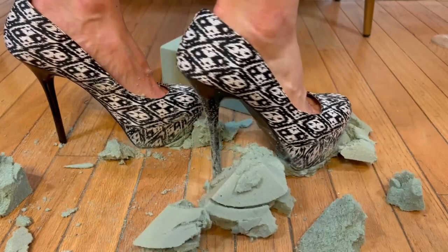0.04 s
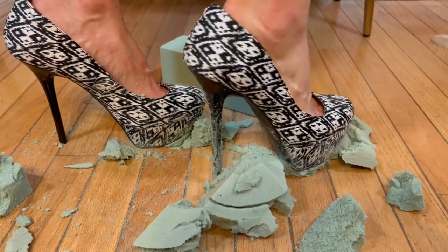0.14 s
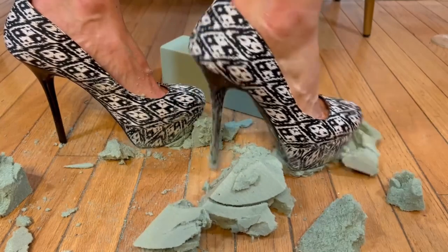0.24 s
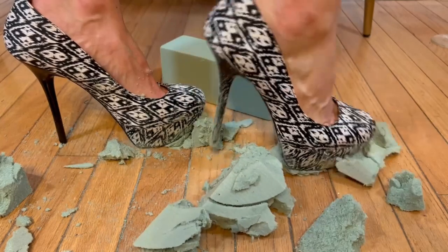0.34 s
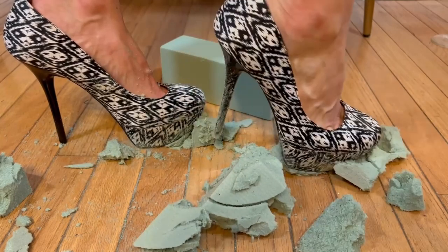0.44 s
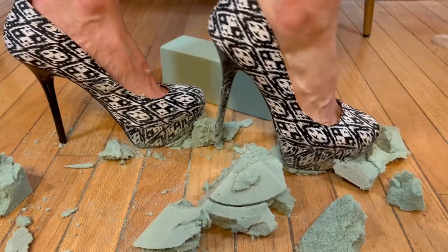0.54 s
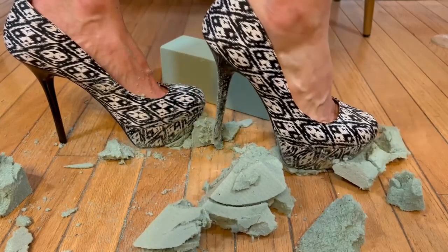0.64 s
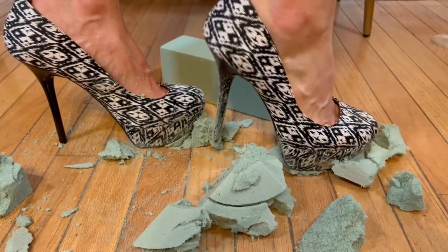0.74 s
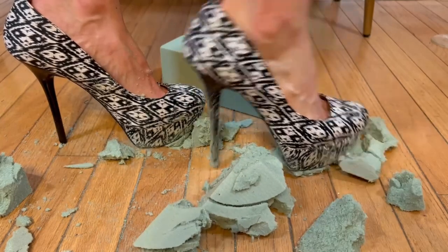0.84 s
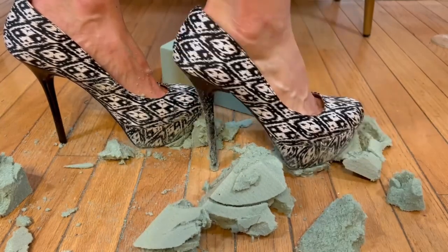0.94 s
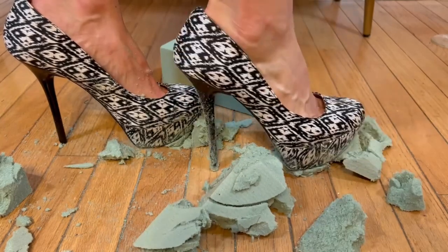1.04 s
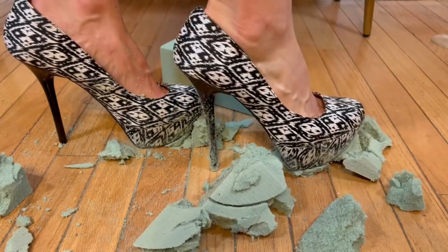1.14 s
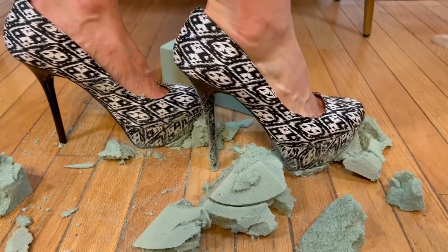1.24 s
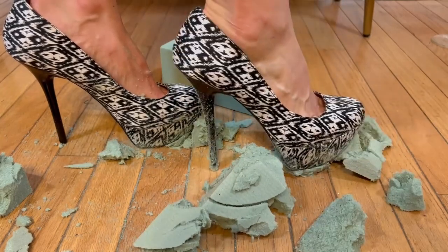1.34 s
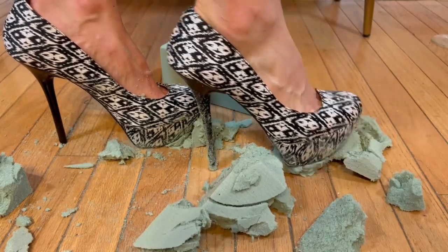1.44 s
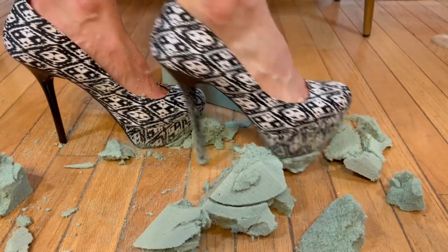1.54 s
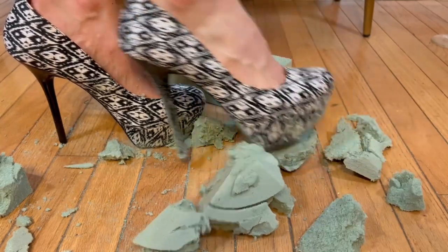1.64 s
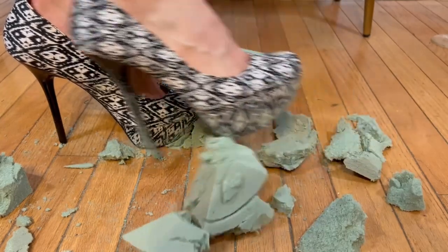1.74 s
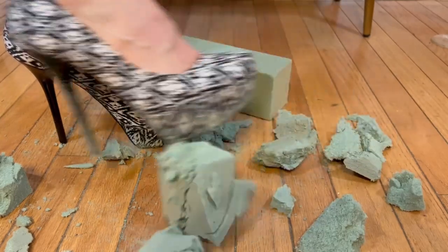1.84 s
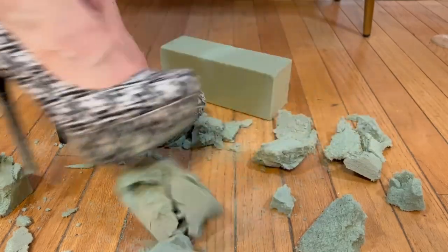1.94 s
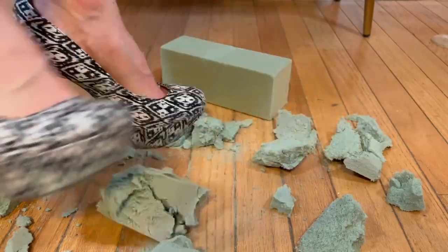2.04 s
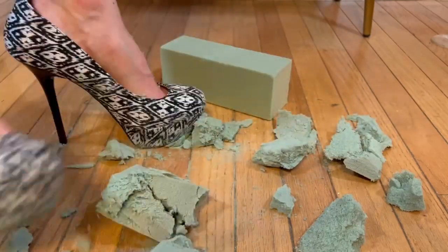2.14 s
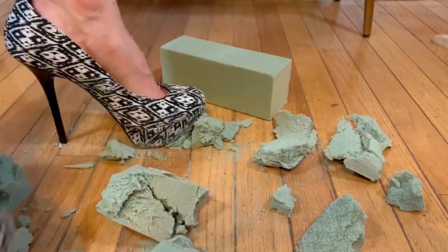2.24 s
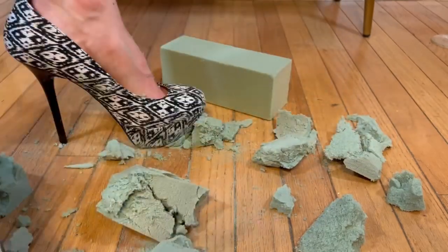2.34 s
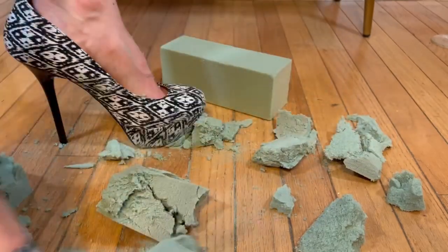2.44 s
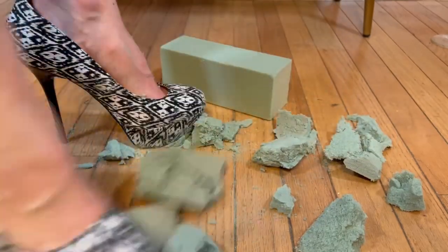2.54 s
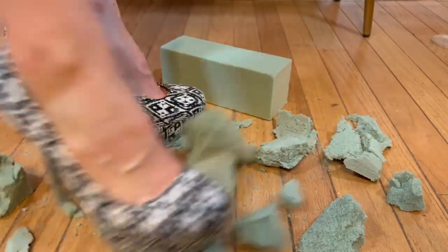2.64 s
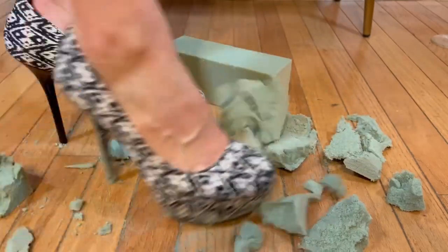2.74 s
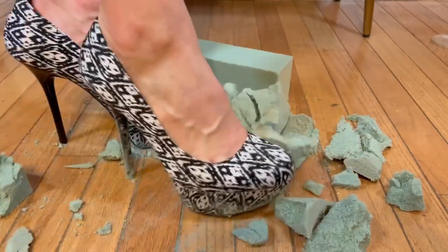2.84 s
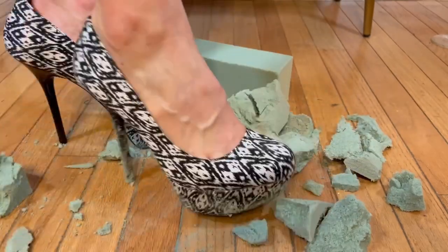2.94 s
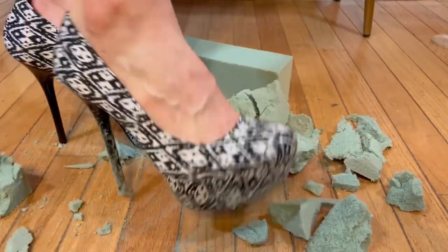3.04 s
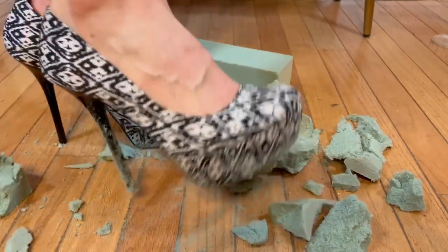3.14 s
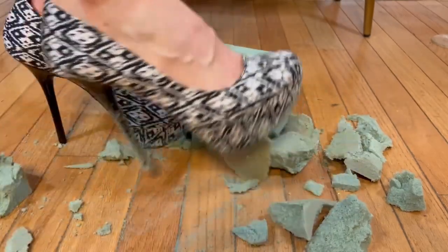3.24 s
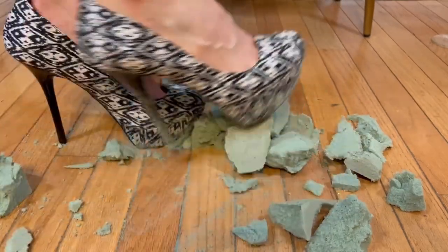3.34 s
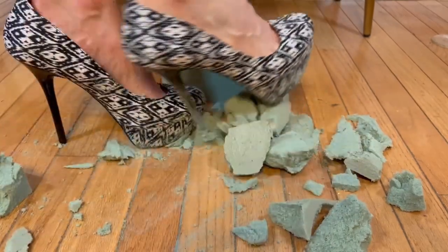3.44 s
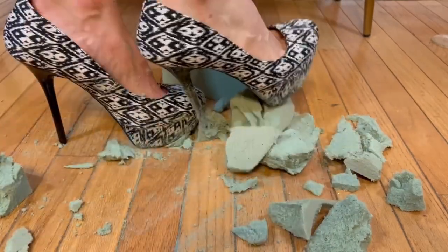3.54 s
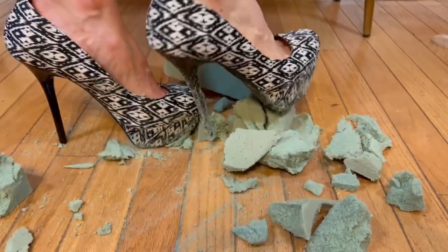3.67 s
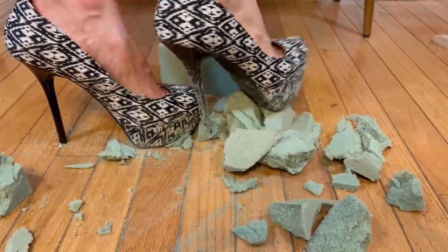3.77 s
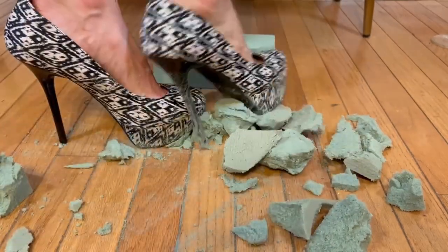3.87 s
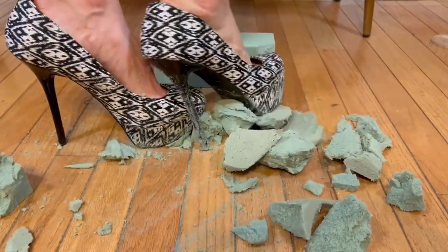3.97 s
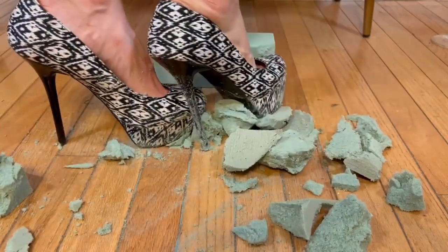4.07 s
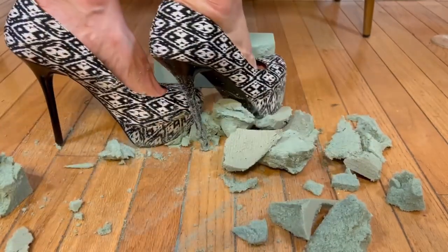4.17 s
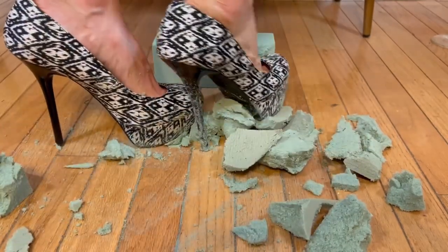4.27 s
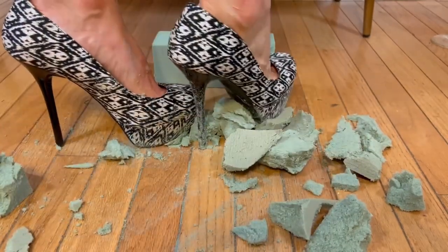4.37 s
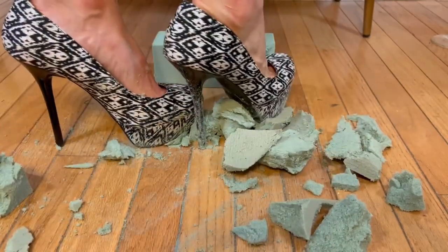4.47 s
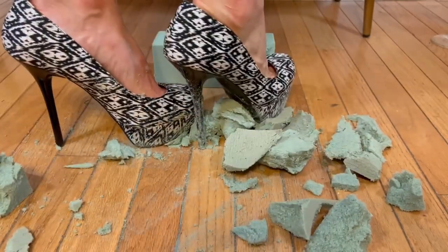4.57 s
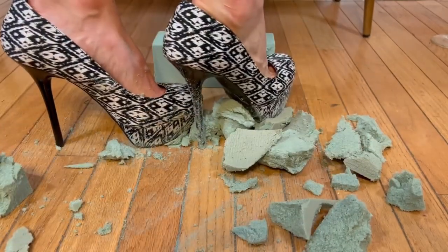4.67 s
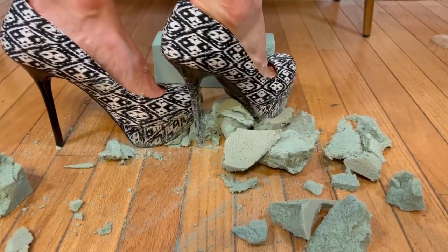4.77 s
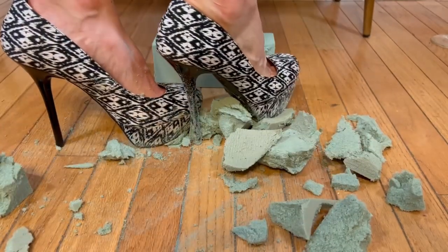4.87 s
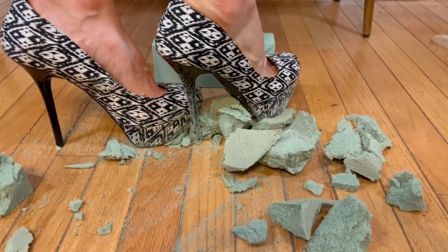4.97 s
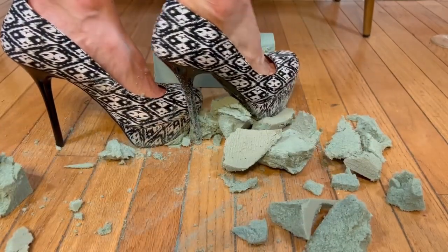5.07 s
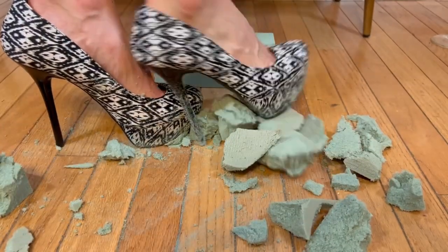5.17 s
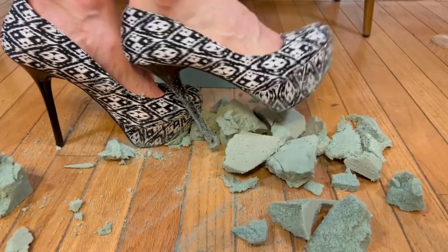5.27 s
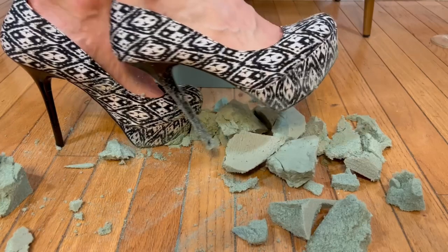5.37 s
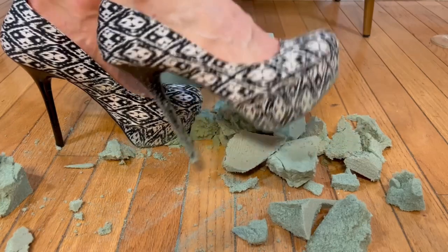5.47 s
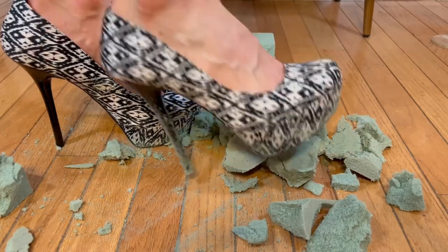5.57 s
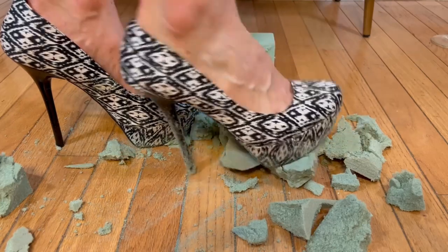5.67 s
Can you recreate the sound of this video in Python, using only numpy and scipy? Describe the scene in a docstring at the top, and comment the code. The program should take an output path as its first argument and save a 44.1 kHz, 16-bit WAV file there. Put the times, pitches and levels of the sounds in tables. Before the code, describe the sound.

Dry foam crunches and crackles at once under a stiletto shoe, heard close in a quiet room with a faint hum. The foam squeaks briefly against the sole at about 0.3 seconds and again at 0.8, followed by a sharp crack and a thud on the wooden floor at 0.9. Until 2.5 there is only faint crumbling, with small ticks and taps. Several knocks on the boards come with light crunches between 2.5 and 2.9. From 3.5 a knock and lower, stuttering squeaks lead into the loudest crunch, near 3.8. A heel knocks just before 4, and dense, crisp snaps run on to about 4.3. The foam creaks from 4.7 to 4.9 and crunches softly around 5.1. A heavy, dull thud on the floorboards comes at about 5.7.

```python
"""Dry craft foam crunches, snaps and squeaks under stiletto heels on a wooden floor, heard up close.
Countless tiny cells collapse to make the crunch, and single cell walls break with a snap.
The foam sticks and slips against the sole: fast slips squeak, slow uneven ones creak.
Heel and sole knock the boards, which ring and rumble. The room is quiet; the house hums faintly."""
import sys
import numpy as np
from scipy import signal
from scipy.fft import rfft, irfft, next_fast_len
from scipy.io import wavfile
from scipy.ndimage import uniform_filter1d, map_coordinates

SR = 44100
rng = np.random.default_rng(int(sys.argv[2]) if len(sys.argv) > 2 else 0)


def generate_wav(signal):
    """Clip the signal to [-1, 1] and save it as 16-bit WAV at the path in sys.argv[1]."""
    frames = np.transpose(np.atleast_2d(signal))
    scaled = np.clip(frames, -1, 1) * 32767
    pcm = np.round(scaled).astype(np.int16)
    wavfile.write(sys.argv[1], SR, pcm)


N = 251798

# how alike left and right sound: f/Hz, likeness (1 = the same)
LIKENESS = [(30, 0.89), (60, 0.88), (130, 0.91), (290, 0.44), (640, 0.46), (1400, 0.23), (3000, 0.24),
            (7000, 0.14)]
# how long the room echoes: f/Hz, time to fade by 60 dB/s
ROOM_DECAY = [(100, 0.35), (500, 0.31), (2000, 0.38), (6000, 0.29), (14000, 0.075)]
# tone colour of the room's air: f/Hz, level/dB
AIR_COLOUR = [(15, -48), (25, 4), (53, 0.5), (146, -9.5), (242, -12), (339, -52), (392, -29), (431, -19.5),
              (635, -26), (868, -29), (1000, -33), (1080, -64), (8000, -43), (11000, -48), (16000, -60)]
# the tones of the house hum: f/Hz, relative level/dB
HUM_TONES = [(41, -76), (119, -76.5)]
# a thin drone that fades and swells: t/s, relative level/dB
DRONE_LEVELS = [(0, -74.5), (1.5, -78), (4.5, -75.5), (5.71, -68.5)]
# the notes the floorboards ring at: f/Hz, level/dB, time to fade by 60 dB/s
BOARD_NOTES = [(42.1, -7.5, 0.92), (71.5, -11.5, 0.26), (84.8, -6, 0.28), (118.5, -0.5, 0.19),
               (176.8, 4.5, 0.049), (248.3, -4.5, 0.055), (311.7, -0.5, 0.057), (467, -1.5, 0.038),
               (591, -11, 0.046), (739, -11.5, 0.078)]
# heel and sole hit the boards: t/s, level/dB, hardness/dB, heaviness/dB, thud f/Hz
KNOCKS = [(0.238, -41, -34, -4, 87), (0.847, -42, -18, -30, 190), (0.894, -15.5, -18.5, -15.5, 125.3),
          (0.939, -35, -26, -21, 105.6), (0.958, -41, -13, -1, 90.1), (1.087, -47.5, -6, -3, 89),
          (1.283, -47.5, -7, -14.5, 154), (1.332, -41, -9.5, -35, 130), (1.985, -44, -22, -15, 119),
          (2.457, -36.5, -14, -7, 125), (2.578, -19, -22, -30, 121.6), (2.635, -25.5, -32, -42, 113),
          (2.69, -25, -18.5, -25, 118), (2.743, -33.5, -17, -28, 118), (3.462, -28.5, -15, -19, 80),
          (3.91, -25.5, -38, -31, 148), (3.951, -19.5, -10, -25, 92), (3.978, -36, -20, -23.5, 97),
          (4.326, -38.5, -26, -21, 109), (4.453, -39, -25, -8.5, 106), (4.691, -39, -21, -26, 97),
          (4.877, -43.5, -12, -25, 149), (4.93, -39.5, -28, -25, 136), (5.152, -41.5, -23, -33, 160),
          (5.236, -40, -33, -7.5, 73), (5.685, -33.5, -17, -36.5, 170), (5.698, -10, -45.5, -42.5, 110)]
# slow slips under load: start t/s, end t/s, first and last slip rate/Hz,
# first and last level/dB, low and high band edge f/Hz
CREAKS = [(1.297, 1.359, 400, 270, -59, -34, 5500, 9200), (4.701, 4.922, 150, 320, -25.5, -38.5, 800, 4630)]
# foam slipping on the sole, one list for each squeak: t/s, slip rate/Hz, level/dB
SQUEAKS = [
    [(.245, 1170, -30.5), (.254, 1302, -22.5), (.28, 1266, -19.5), (.293, 1183, -29.5), (.312, 1094, -40),
     (.335, 1058, -42), (.342, 1020, -62)],
    [(.300, 1438, -54), (.312, 1470, -25.5), (.335, 1380, -35.5), (.345, 1400, -70)],
    [(.764, 898, -49), (.768, 934, -21), (.775, 983.5, -19.5), (.803, 963.4, -23.5), (.817, 777, -24.5),
     (.838, 698, -33.5), (.843, 706, -51.5)],
    [(2.79, 1045, -46), (2.797, 1025, -41), (2.815, 1050, -60), (2.825, 1075, -77)],
    [(3.51, 420, -49), (3.525, 457, -41.5), (3.585, 455.3, -36), (3.60, 440, -69)],
    [(3.585, 740, -38), (3.6, 716, -37), (3.63, 733, -44), (3.645, 745, -57)],
    [(3.688, 481, -26), (3.70, 501.6, -40), (3.722, 482, -41), (3.732, 434, -25.5), (3.765, 462.6, -37.5),
     (3.78, 415, -43)],
]
# tone colour of a squeak on the sole: f/Hz, level/dB
SOLE_COLOUR = [(250, -18), (460, 10.5), (900, -4), (1300, -0.5), (2500, 1), (3700, -10), (4400, -1),
               (5000, -6.5), (7000, -9.5), (9000, -1), (12000, -2), (16000, -28)]
# single cell walls breaking: t/s, ring level/dB, ring f/Hz, crack level/dB, treble level/dB
SNAPS = [(0.042, -31, 566, -32, -21), (0.0462, -39, 664, -23, -37), (0.4251, -34.5, 1180, -24, -41),
         (0.5289, -32.5, 1980, -32, -53), (0.5797, -43, 1680, -57, -38), (1.2794, -47, 670, -49, -62.5),
         (1.2958, -41.5, 2260, -35, -54), (1.4029, -38.5, 2850, -43, -36.5), (1.4125, -39, 5060, -25, -35),
         (1.9046, -41.5, 3260, -39.5, -34), (1.9733, -43, 1740, -27.5, -36), (2.2072, -57, 790, -44.5, -57),
         (2.6475, -35, 4590, -33, -23), (2.7941, -34, 2030, -26.5, -27), (2.9303, -44, 2010, -37, -33),
         (2.9561, -40.5, 2800, -45, -51), (3.04, -56, 810, -60, -69), (3.446, -44, 2630, -40, -31),
         (3.9102, -25.5, 4740, -16, -13), (3.9537, -23.5, 1540, -23, -14), (3.9843, -22.5, 845, -44, -37),
         (4.0041, -23, 4000, -14, -29.5), (4.014, -25, 1940, -40, -20), (4.0325, -22.5, 3870, -21, -26),
         (4.041, -25.5, 910, -37, -27), (4.0593, -31, 3760, -41, -25), (4.0981, -24, 4970, -10.5, -38),
         (4.114, -21.5, 960, -13, -36), (4.1945, -20, 3530, -14, -12), (4.2939, -30.5, 1250, -21, -23),
         (4.3332, -23.5, 4470, -21, -19.5), (4.6449, -42, 1185, -36, -66), (4.6744, -35, 990, -38, -51),
         (4.6786, -33, 2360, -33, -54), (4.9643, -47, 4480, -49, -30.5), (4.992, -53, 1180, -40, -50),
         (5.246, -55, 1100, -40, -58), (5.4846, -57, 794, -42.5, -53)]
# runs of snaps: start t/s, end t/s, gap/s, ring level/dB, ring f/Hz, crack level/dB, treble level/dB
SNAP_RUNS = [(.0005, .026, 0.005, -25, 4170, -38, -23), (.8439, .862, 0.0048, -18.5, 3420, -19.5, -10.5),
             (4.4716, 4.515, .0119, -43.5, 705, -39, -38), (4.6989, 4.76, 0.017, -49, 1190, -57, -66)]
# tone colours of the crunch, from coarse breaks through cells to fine dust: f/Hz, level/dB
COARSE_COLOUR = [(150, -23), (300, -7), (450, -7.5), (700, -1.5), (1100, 0), (2000, -3), (4000, -57)]
CELL_COLOUR = [(600, -12), (1300, -18.5), (2200, 2), (3500, -1), (5500, -2), (8000, -4.5), (10000, -24)]
DUST_COLOUR = [(6500, -17.5), (8800, -5), (10000, -14.5), (11600, -1.5), (12500, -10.5), (14000, -12),
               (16000, -7.5)]
# the shoe presses the foam: t/s, rise/s, level/dB, hold/s, fall/(dB/s), coarse offset/dB, dust offset/dB
PRESSES = [(0, 0.011, -34.5, 0.013, 166, -0.5, -5), (0.236, 0.26, -51, .005, 498, 1, 4),
           (.25, 0.018, -29.5, 0.039, 495.5, -16, -4.5), (0.297, .01, -39, .005, 75.5, -1, -5),
           (0.759, 0.084, -49.5, .005, 499, 2.5, -1), (0.768, 0.0083, -29.5, 0.09, 230, -29, -2.5),
           (0.855, .02, -35, .005, 110, -3, -7), (1.298, 0.023, -54.5, .005, 89, 2.8, -8),
           (1.41, 0.052, -54, 0.52, 44, -4, 1.3), (1.972, 0.019, -56, .005, 93, -12, 2),
           (2.549, 0.26, -49.5, 0.034, 100, -2.5, 2), (2.66, 0.27, -43, .005, 83.5, -14.5, 3),
           (2.804, 0.25, -45, .005, 165, -8, -19), (2.922, 0.027, -57, 0.0082, 96, -12, -6),
           (3.451, 0.016, -34, 0.21, 104, -9.5, -2), (3.599, 0.14, -29, 0.031, 135, -4.5, -21.5),
           (3.71, 0.059, -20.5, 0.0054, 119, -4, -10), (3.813, 0.29, -36, 0.32, 107, -5, -1),
           (4.193, 0.01, -43, 0.0062, 250, -4, -1), (4.226, 0.022, -39, .12, 129, -9, 2.5),
           (4.678, 0.027, -53, 0.21, 75, 5, -1.5), (5.088, 0.26, -58.5, .03, 97, -2, 6),
           (5.128, 0.053, -45.5, 0.032, 108, -3.5, -2), (5.46, 0.13, -68, 0.0066, 132.5, -6, 2.5),
           (5.684, 0.016, -51, .03, 100, -3, 2.5)]
# crumbs settling between presses: coarse level/dB, cell level/dB, dust level/dB
SETTLING = (-73.5, -72.5, -71.5)

TOP_HZ = 16100  # the highest pitch heard


def amp(db):
    """Turns decibels into a number to multiply by."""
    return 10 ** (np.asarray(db) / 20)


def unit(x):
    """Scales a signal to an average strength (rms) of 1."""
    return x / np.sqrt(np.mean(x ** 2) + 1e-20)


def along(points, hz):
    """Reads between (Hz, value) points on a log frequency scale."""
    f, v = np.transpose(points)
    return np.interp(np.log(hz + 1), np.log(f + 1), v)


def curves(rows, t):
    """Reads each column after the first at times t."""
    s, *columns = np.transpose(rows)
    return [np.interp(t, s, column) for column in columns]


def wobble(rate, count):
    """A smooth random curve, count samples long, through rate random points a second."""
    points = rng.standard_normal(int(count * rate / SR) + 4)
    return map_coordinates(points, [np.arange(count) * rate / SR])


def filtered(x, response):
    """Scales and delays each frequency of x as response(hz) says."""
    m = next_fast_len(x.shape[-1] + 8192)
    return irfft(rfft(x, m) * response(np.fft.rfftfreq(m, 1 / SR)), m)[..., :x.shape[-1]]


def coloured(x, colour):
    """Gives x a tone colour and a strength of 1."""
    return unit(filtered(x, lambda hz: amp(along(colour, hz))))


def band(x, low_hz, high_hz):
    """Softens everything outside a band and scales the peak to 1."""
    y = signal.sosfilt(signal.butter(2, [low_hz, high_hz], "bandpass", fs=SR, output="sos"), x)
    return y / np.abs(y).max()


def add(track, s, sound):
    """Mixes a sound in at s seconds."""
    part = track[round(s * SR):][:len(sound)]
    part += sound[:len(part)]


def stereo(a, b):
    """Blends two noises into left and right, alike in the bass and unlike above."""
    def shares(hz):
        angle = np.arccos(np.clip(along(LIKENESS, hz), -1, 1)) / 2
        return np.array([np.cos(angle), np.sin(angle)])
    mid, side = filtered(np.array([a, b]), shares)
    return np.array([mid + side, mid - side])


def house(drone_hz=234):
    """Room air, a wavering hum and a thin drone."""
    t = np.arange(N) / SR
    air = stereo(*(coloured(rng.standard_normal(N), AIR_COLOUR) for _ in range(2)))
    hum = np.zeros(N)
    for hz, db in HUM_TONES + [(drone_hz, curves(DRONE_LEVELS, t)[0])]:
        gain = amp(db + 5 + 2.9 * wobble(6, N))
        hum += gain * np.sin(2 * np.pi * hz * t + 0.58 * wobble(12, N))
    return amp(-60 + 0.54 * wobble(4.4, N)) * air + hum


def room_echo(x):
    """The room answers a moment later, and each frequency dies away at its own speed."""
    hz, t, noise = signal.stft(rng.standard_normal((2, SR * 3 // 4)), SR, nperseg=256)
    fade = amp(-60 * t / along(ROOM_DECAY, hz)[:, None])
    tail = stereo(*signal.istft(noise * fade, SR, nperseg=256)[1])
    delayed = np.pad(x, (130, 0))[None]
    return signal.fftconvolve(delayed, tail / np.linalg.norm(tail[0]), axes=1)[:, :N]


def foot_weight(load_db=-12, rest_db=-70.5, shudder_db=-18.5, fade_db_per_s=79):
    """The push on the boards follows the foam's coarse breaks and lingers after each knock."""
    shudder, t = np.zeros(N), np.arange(SR // 2) / SR
    for s, db, *_ in KNOCKS:
        add(shudder, s, amp(db + shudder_db - fade_db_per_s * t) ** 2)
    load = amp(load_db) * press_levels()[0]
    return np.sqrt(load ** 2 + shudder + amp(rest_db) ** 2)


def board_rumble():
    """An uneven push of the foot keeps the boards' low notes sounding."""
    def boards(f):
        notes = sum(amp(db) * 1j * f * (2.2 / decay) ** .5 / (hz * hz - f * f + 1j * f * 6 / decay)
                    for hz, db, decay in BOARD_NOTES[1:7])
        return notes / (1 + (f / 260) ** 4)  # a soft push holds no treble
    push = amp(3 * wobble(25, N)) * rng.standard_normal(N)
    return foot_weight() * unit(filtered(push, boards))


def knocks(detune=0.048, scatter_db=2.5, thud_decay_s=0.19):
    """Each blow rings the boards; low notes swell later, since slow bending waves arrive last."""
    out, t = np.zeros(N), np.arange(SR // 2) / SR
    end_fade = np.minimum(10 * (t[-1] - t), 1)
    note_hz, note_db, decay_s = np.transpose(BOARD_NOTES)[:, :, None]
    for s, db, hard_db, heavy_db, thud_hz in KNOCKS:
        size, shift = rng.standard_normal((2, *note_db.shape))
        hz = note_hz * (1 + detune * shift)  # each spot of the floor is tuned a little differently
        hard = np.clip(np.log2(hz / 200), 0, 1) * (hard_db + 21.5)  # a hard hit reaches the high notes
        heavy = np.clip(np.log2(100 / hz), 0, 1) * (heavy_db + 13)  # a heavy one moves the beams
        spot = -3 * np.minimum(np.abs(np.log2(hz / thud_hz)), 2)  # notes near the thud are favoured
        gain = amp(note_db + hard + heavy + spot + scatter_db * size - 60 * t / decay_s)
        ring = gain * (1 - np.exp(-t * hz / 0.62)) * np.sin(2 * np.pi * hz * t)
        # the first wave falls in pitch as it spreads
        extra_cycles = 2.008 * (1 - np.exp(-t / 0.0044)) + 2.198 * (1 - np.exp(-t / 0.029))
        thud_shape = amp(-60 * t / thud_decay_s) * (1 - np.exp(-t / 0.0053))
        thud = thud_shape * np.sin(2 * np.pi * (thud_hz * t + extra_cycles))
        add(out, s, amp(db - 3.5) * end_fade * ring.sum(axis=0) + amp(db - 6) * thud)
    return out


def creaks():
    """Each slow slip lets go of pressure in one sharp pull of random size."""
    out = np.zeros(N)
    for start, end, first_hz, last_hz, first_db, last_db, low_hz, high_hz in CREAKS:
        n = round((end - start) * SR)
        rate = np.linspace(first_hz, last_hz, n) * amp(1.6 * wobble(150, n))
        slips_so_far = np.floor(np.cumsum(rate) / SR)
        slips = np.diff(slips_so_far, prepend=0) * amp(2.3 * wobble(3000, n))
        add(out, start, -amp(np.linspace(first_db, last_db, n)) * band(slips, low_hz, high_hz))
    return out


def squeaks():
    """Foam sticks and slips so fast that the pulses make a tone; slower slips are more uneven."""
    out, harmonic = np.zeros(N), np.arange(1, 34)[:, None]
    lag = 0.147 * harmonic ** 2  # the treble of each pulse trails behind
    for rows in SQUEAKS:
        t = np.arange(rows[0][0], rows[-1][0], 1 / SR)
        hz, db = curves(rows, t)
        slowness = 1000 / hz
        jitter = 0.011 * slowness ** 2 * wobble(700, len(t))
        cycles = np.cumsum(hz * (1 + jitter)) / SR
        gains = amp(along(SOLE_COLOUR, harmonic * hz)) * (harmonic * hz < TOP_HZ)
        slips = np.sum(gains * np.cos(2 * np.pi * harmonic * cycles - lag), axis=0)
        flutter_db = 1.4 * wobble(400, len(t))
        stutter_db = 0.5 * slowness ** 3.3 * wobble(95, len(t))
        add(out, t[0], amp(db + flutter_db + stutter_db) * unit(slips))
    return out


def travelling_cracks(scatter_db=1.5, scatter_octaves=0.19):
    """A crack runs through the foam: lists its snaps, each of random size and pitch."""
    rows = [(s, *rest) for start, end, gap, *rest in SNAP_RUNS for s in np.arange(start, end, gap)]
    s, ring_db, hz, crack_db, treble_db = np.transpose(rows)
    size, pitch, spit = rng.standard_normal((len(s), 3)).T
    return list(zip(s, ring_db + scatter_db * size, hz * 2 ** (scatter_octaves * pitch),
                    crack_db + scatter_db * size, treble_db + scatter_db * spit))


def snaps(ring_s=0.005, ring_cycles=4):
    """A cell wall breaks: a dry crack, a brighter spit and a short ring from the broken piece."""
    out, t = np.zeros(N), np.arange(1200) / SR
    for s, ring_db, hz, crack_db, treble_db in SNAPS + travelling_cracks():
        burst = amp(-60 * t / 0.0021) * rng.standard_normal((2, len(t)))
        crack = amp(crack_db) * band(burst[0], 1100, 8000)
        spit = amp(treble_db) * band(burst[1], 9000, 15000)
        fade = amp(-60 * t / (ring_s + ring_cycles / hz))
        ring = np.sin(2 * np.pi * hz * t) * (1 - np.exp(-t * hz / 0.52)) * fade
        add(out, s, crack + spit + amp(ring_db) * ring / np.abs(ring).max())
    return out


def press_levels(rise_db=35, sag_db_per_s=16):
    """How strong coarse breaks, cells and dust are: each press rises, eases while held, then falls."""
    s, rise, db, hold, fall, coarse_db, dust_db = np.transpose(PRESSES)[:, :, None]
    t = np.arange(0, N / SR, .001)
    age = t - s
    shape_db = db + rise_db * np.minimum(age, 0) / rise
    shape_db -= sag_db_per_s * np.clip(age, 0, hold)
    shape_db -= fall * np.maximum(age - hold, 0)
    powers = [np.sum(amp(shape_db + offset_db) ** 2, axis=0) + amp(rest_db) ** 2
              for offset_db, rest_db in zip((coarse_db, 0, dust_db), SETTLING)]
    return [np.interp(np.arange(N) / SR, t, np.sqrt(power)) for power in powers]


def ringing_lumps(x, depth_db=3):
    """Lumps of foam ring briefly at their own pitches: random patches of x get louder or softer."""
    spectrum = signal.stft(x, nperseg=512)[2]
    patches = uniform_filter1d(rng.standard_normal(spectrum.shape[1:]), size=3, axis=0)  # across pitch
    patches = uniform_filter1d(patches, size=7, axis=1)  # across time
    return signal.istft(spectrum * amp(depth_db * unit(patches)), nperseg=512)[1][:, :N]


def crunch(grains_per_s=600, sliding_db=-7):
    """Countless cells collapse: noise with spiky, clumped grains, shared by all three sizes of break."""
    t = np.arange(N) / SR
    spikes = (rng.random(N) < grains_per_s / SR) * amp(np.minimum(4 * rng.exponential(size=N), 13))
    grit = np.abs(uniform_filter1d(spikes, size=14))
    clumps = amp(0.43 * wobble(45, N) + 1.16 * wobble(200, N))
    grains = clumps * (1 + 0.22 * unit(grit))
    # during the first three squeaks the sliding sole breaks fewer cells
    spans = [(rows[0][0], rows[1][0], rows[-2][0], rows[-1][0]) for rows in SQUEAKS[:3]]
    sliding = np.max([np.interp(t, span, (0, 1, 1, 0)) for span in spans], axis=0)
    coarse_gain, cell_gain, dust_gain = press_levels()
    layers = []
    for _ in range(2):
        noises = ringing_lumps(grains * rng.standard_normal((3, N)))
        coarse, cells, dust = map(coloured, noises, (COARSE_COLOUR, CELL_COLOUR, DUST_COLOUR))
        breaks = coarse_gain * coarse + cell_gain * cells
        layers.append(amp(sliding_db * sliding) * breaks + dust_gain * dust)
    return stereo(*layers)


def scene():
    """Foam and floor close by, their echo in the room, and the house behind them."""
    squeal = squeaks()
    crackle = snaps() + creaks()
    floor = knocks() + board_rumble()
    crush = crunch()
    to_room = amp(-5.5) * squeal + amp(-8) * crackle + amp(-6) * floor + amp(-13.5) * crush[0]
    return squeal + crackle + floor + crush + room_echo(to_room) + house()


def record(dry, split_hz=8100, in_step_hz=8440, step_hz=3620):
    """Two microphone holes hear the same treble, the left later, so bands go in and out of step."""
    treble = lambda hz: np.sin(np.pi / 2 * np.clip((hz - split_hz) / 600, 0, 1)) ** 2
    lag = lambda hz: np.exp(np.array([[-1j], [1j]]) * np.pi * (hz - in_step_hz) / step_hz)
    lows = filtered(dry, lambda hz: 1 - treble(hz))
    highs = filtered(np.array([dry[0], dry[0]]), lambda hz: treble(hz) * lag(hz))
    top_cut = lambda hz: np.sin(np.pi / 2 * np.clip((TOP_HZ - hz) / 500, 0, 1)) ** 2
    bass_cut = lambda hz: hz ** 2 / (hz ** 2 + 25 ** 2)
    return filtered(lows + highs, lambda hz: top_cut(hz) * bass_cut(hz))


dry = scene()
out = record(dry)
generate_wav(out)
```